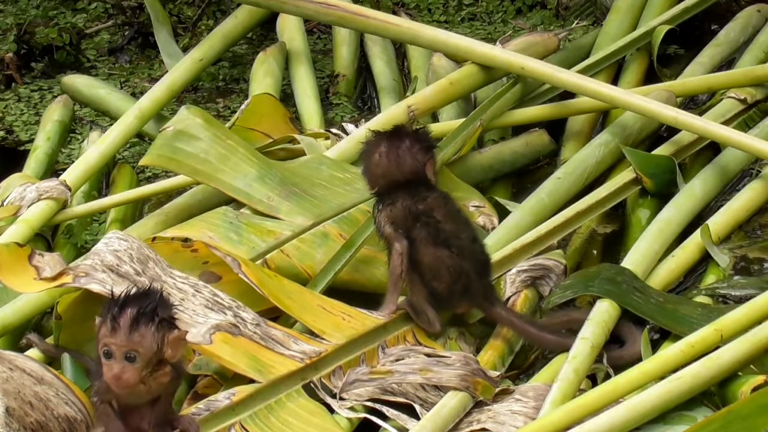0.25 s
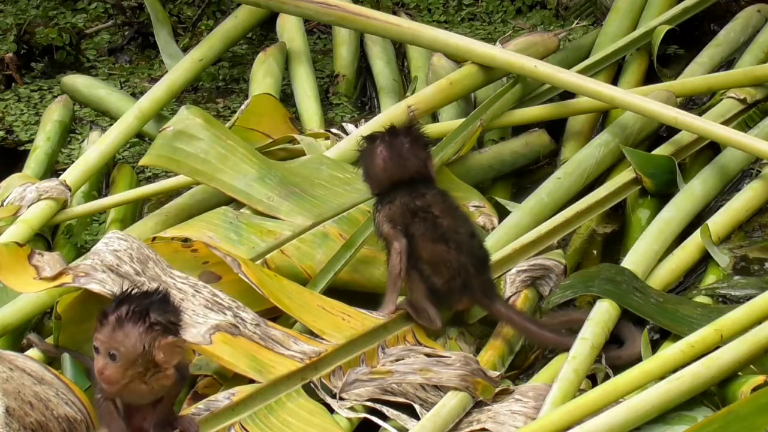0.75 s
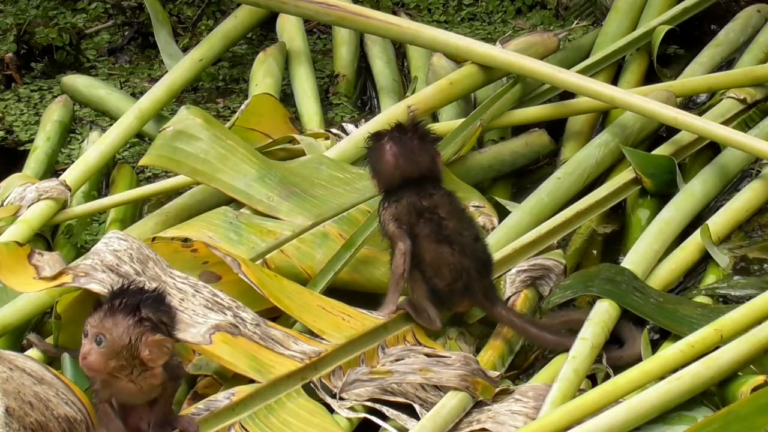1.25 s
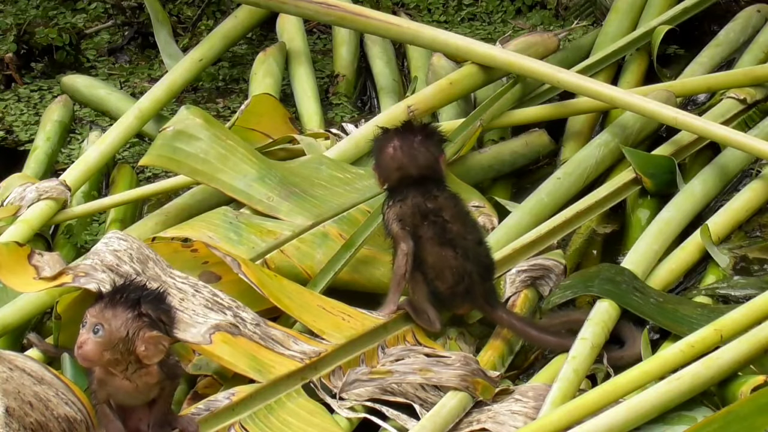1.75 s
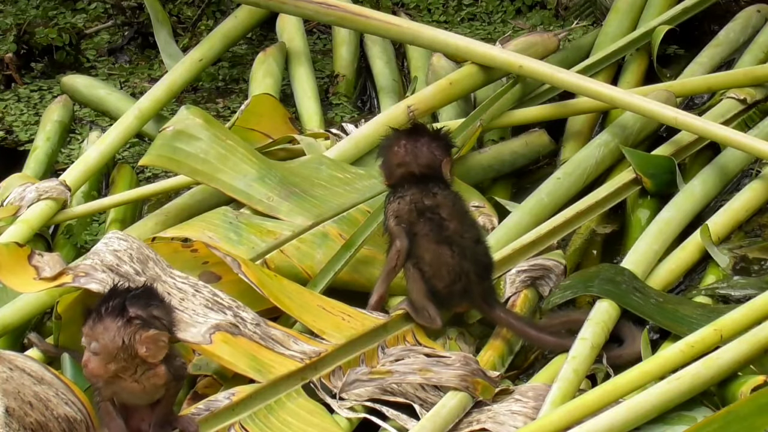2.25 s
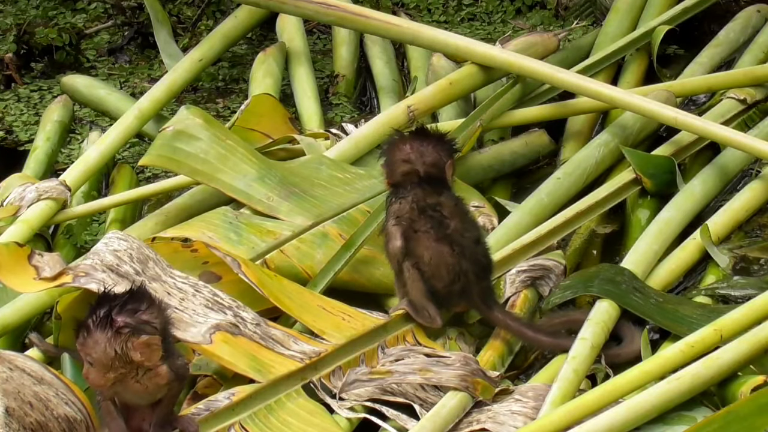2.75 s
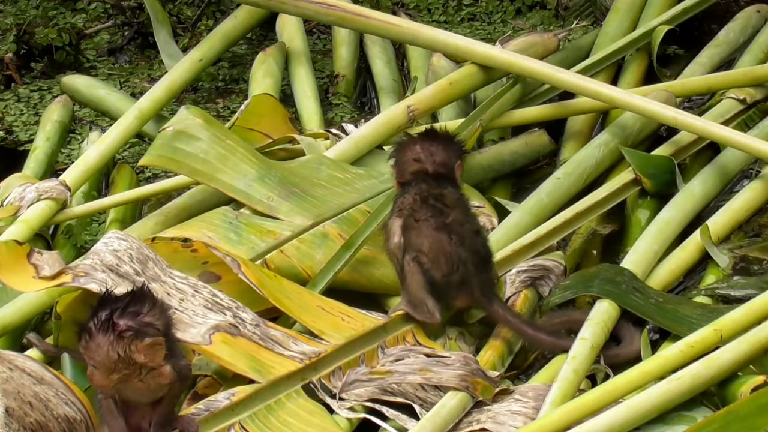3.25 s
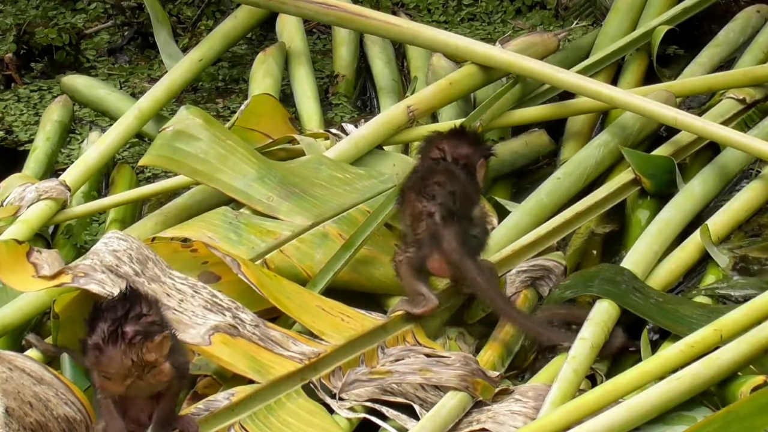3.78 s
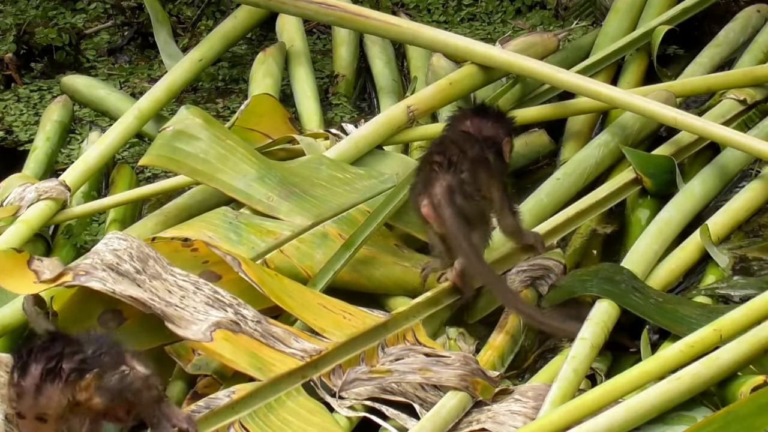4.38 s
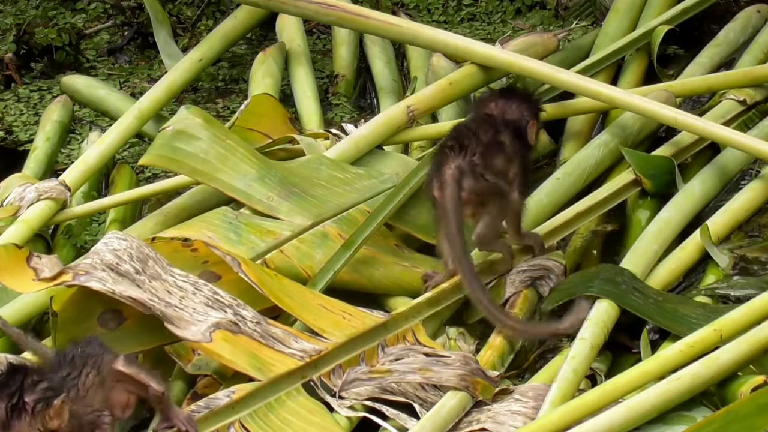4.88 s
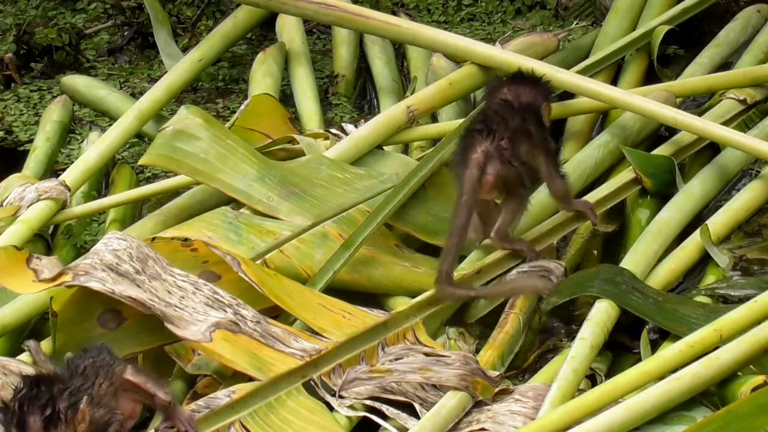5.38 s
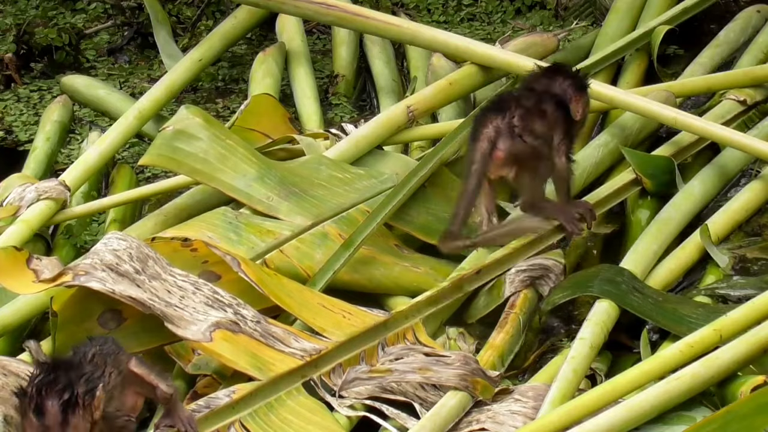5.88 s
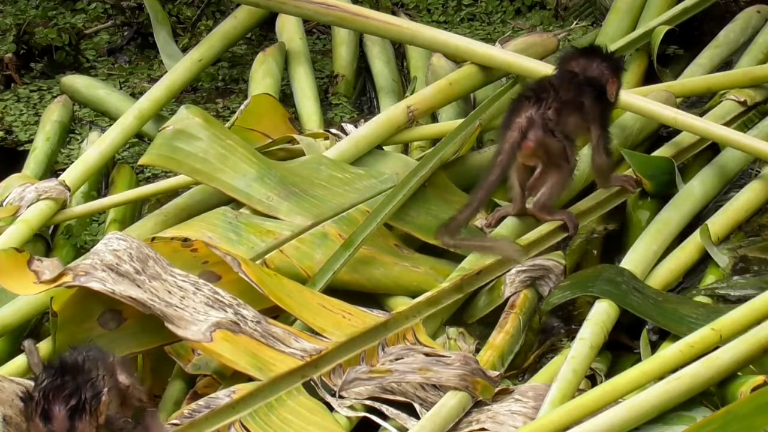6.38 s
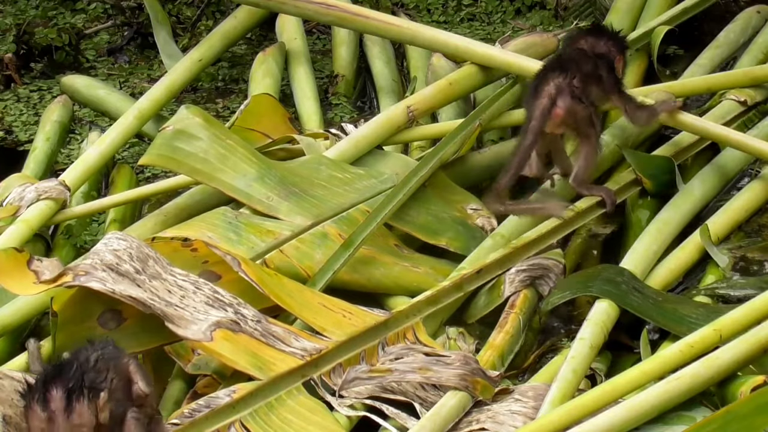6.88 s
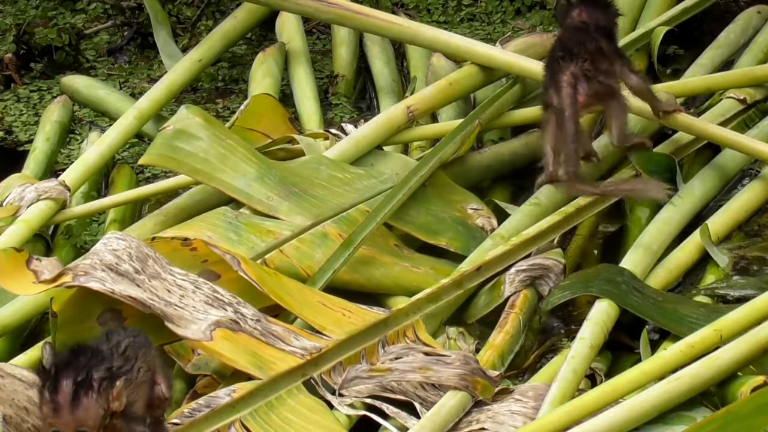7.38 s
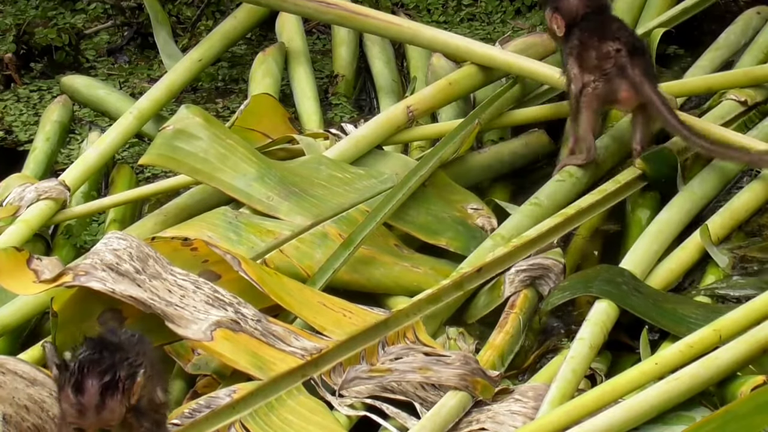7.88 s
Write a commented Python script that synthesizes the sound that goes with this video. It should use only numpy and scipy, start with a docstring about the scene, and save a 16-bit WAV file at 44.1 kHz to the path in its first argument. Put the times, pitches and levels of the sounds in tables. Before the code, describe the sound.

A baby monkey by a pond gives one clear whistled cry, then scattered shrill squeaks and soft coos, over low outdoor rumble and faint insects.

```python
"""Beside a pond, a baby monkey clambers over cut water-plant stems.
Its voice is a stack of overtones shaped by the mouth: shrill screams and quick yelps that turn raspy as
their pitch falls, one long whistled cry, soft closed-mouth coos.
Stems tick and leaves rustle as short noise bursts; hollow pops ring as damped tones.
Insects and far chirps are narrow noise bands, over coloured noise for the low outdoor rumble."""
import sys
import numpy as np
from scipy import signal
from scipy.fft import rfft, irfft, next_fast_len
from scipy.io import wavfile

SR = 44100
rng = np.random.default_rng(int(sys.argv[2]) if len(sys.argv) > 2 else 0)


def generate_wav(signal):
    """Clip the signal to [-1, 1] and save it as 16-bit WAV at the path in sys.argv[1]."""
    frames = np.transpose(np.atleast_2d(signal))
    scaled = np.clip(frames, -1, 1) * 32767
    pcm = np.round(scaled).astype(np.int16)
    wavfile.write(sys.argv[1], SR, pcm)


N = 358533
TIME = np.arange(N) / SR
CUTOFF_HZ = 15600


def from_db(db):
    """Decibels to gain."""
    return 10 ** (np.asarray(db) / 20)


def rms_one(x):
    """Scale to unit power."""
    return x / np.sqrt(np.mean(x ** 2) + 1e-20)


def in_time(rows, t):
    """Each column of a curve table at the times t."""
    knot_s, *columns = np.transpose(rows)
    return [np.interp(t, knot_s, column) for column in columns]


def at_hz(points, hz):
    """Read a spectrum on a log-frequency axis."""
    knot_hz, value = np.transpose(points)
    return np.interp(np.log(np.maximum(hz, 1)), np.log(knot_hz), value)


def coloured(x, spectrum):
    """Give a noise the shape of a spectrum; unit power."""
    size = next_fast_len(x.shape[-1])
    hz = np.fft.rfftfreq(size, 1 / SR)
    shaped = irfft(rfft(x, size) * from_db(at_hz(spectrum, hz)), size)
    return rms_one(shaped[..., :x.shape[-1]])


def wander(rate_hz, size):
    """Smooth random signal of unit power that changes at about the given rate."""
    r = np.exp(-2 * np.pi * rate_hz / SR)
    # the first half lets the filter settle
    smooth = signal.lfilter([1], [1, -2 * r, r * r], rng.standard_normal(2 * size))
    return rms_one(smooth[size:])


def during(start_s, end_s):
    """The sample times between two moments."""
    return TIME[(TIME > start_s) & (TIME < end_s)]


def call(t, pitch_hz, level_db, bright_db_per_octave, rasp, throat, rasp_colour, jitter, jitter_hz,
         shimmer_db, hiss_db, flutter_db, falloff_db, split=0, edge_s=0.0028):
    """Vocal folds sound a stack of overtones through the throat; rasp shakes their pitch and strength."""
    span = (TIME >= t[0]) & (TIME <= t[-1])
    doubling = np.maximum(rasp - .15, 0)
    rasp = np.hypot(rasp, .04)   # never perfectly steady
    shaken_hz = pitch_hz * (1 + jitter * rasp * wander(jitter_hz, len(t)))
    phase = 2 * np.pi * np.cumsum(shaken_hz) / SR
    k = np.arange(1, 17)[:, None]   # overtone number
    overtone_hz = k * pitch_hz
    # brightness lifts the lowest overtones in turn, and all higher ones alike
    press_db = bright_db_per_octave * np.log2(np.minimum(k, 3.4))
    gains = from_db(at_hz(throat, overtone_hz) + press_db) * (overtone_hz < CUTOFF_HZ)
    gains *= from_db(falloff_db * np.log2(np.maximum(k / 4, 1)))   # dB per octave past the fourth
    gains /= np.sqrt(np.sum(gains ** 2, axis=0) / 2)
    # each overtone swells and fades on its own
    gains = gains * from_db(flutter_db * np.array([wander(43, len(t)) for _ in k]))
    tone = np.sum(gains * np.sin(k * phase), axis=0)
    tone *= from_db(shimmer_db * rasp * wander(jitter_hz, len(t)))
    # in a hard rasp strong and weak cycles alternate, which puts tones between the overtones
    tone *= 1 + split * doubling * np.cos(phase / 2)
    # turbulent air escapes in a puff on every cycle
    hiss = coloured(rng.standard_normal(len(t)) * (1 + np.cos(phase)), rasp_colour)
    share = from_db(hiss_db) * rasp
    edges = np.clip(np.minimum(t - t[0], t[-1] - t) / edge_s, 0, 1)
    voice = (tone + share * hiss) / np.sqrt(1 + share ** 2)
    out = np.zeros(N)
    out[span] = voice * from_db(level_db) * edges
    return out


# throat with the mouth wide: (freq_hz, gain_db)
WIDE_THROAT = [(800, 23.5), (1400, 2.5), (2000, -10), (2750, 6.5), (3300, -3.5), (4200, 7), (5000, -11),
               (6200, 2), (7200, -0.5), (8300, 0.5), (9400, -6), (10800, -8), (12500, -12), (14500, -25)]
# turbulent air in the rasp: (freq_hz, gain_db)
RASP_SPECTRUM = [(1200, -44), (2800, -5), (4000, 8), (5000, 8), (6400, 24.5), (8300, 23), (9800, 9),
                 (15000, -1)]
# most piercing just under the top, then thinning to a whistle: (pitch_hz, bright_db_per_octave)
VOICE_REGISTER = [(1400, 1), (2000, -0.5), (2350, -0.5), (2700, 9.5), (3080, 5), (3400, -24)]
# the voice breaks up at this sag from the highest pitch so far, and clears again lower down
BREAK_OCTAVES, BREAK_WIDTH_OCTAVES = 0.786, 0.383
ONSET_RASP, ONSET_S = 0.41, 0.0064   # the folds also catch as a squeak starts


def squeak(t, pitch_hz, level_db, bright_db_per_octave, break_rasp, lips_db, steady_rasp, falloff_db):
    """A shrill wide-mouthed call: pitch sets its brightness, and it turns raspy as the pitch sags."""
    sag_octaves = np.log2(np.maximum.accumulate(pitch_hz) / pitch_hz)
    breaking = np.exp(-((sag_octaves - BREAK_OCTAVES) / BREAK_WIDTH_OCTAVES) ** 2)
    onset = ONSET_RASP * np.exp(-(t - t[0]) / ONSET_S)
    rasp = np.clip(steady_rasp + onset + break_rasp * breaking, 0, 1)
    lips = [(7000, 0), (9500, lips_db)]
    throat = [(hz, db + at_hz(lips, hz)) for hz, db in WIDE_THROAT]
    rasp_colour = [(hz, db + at_hz(lips, hz)) for hz, db in RASP_SPECTRUM]
    bright = bright_db_per_octave + at_hz(VOICE_REGISTER, pitch_hz)
    return call(t, pitch_hz, level_db, bright, rasp, throat, rasp_colour, jitter=.05, jitter_hz=700,
                shimmer_db=5, hiss_db=2.5, flutter_db=3.2, falloff_db=falloff_db, split=0.28,
                edge_s=0.0025)


# pitch and loudness of the long screams, one curve each: (time_s, pitch_hz, level_db)
SCREAM_CURVES = [
    [(2.122, 2740, -56), (2.146, 3310, -38), (2.168, 2393, -33), (2.19, 2707, -36.5), (2.205, 3390, -28.5),
     (2.22, 2858, -30), (2.24, 2560, -25.5), (2.26, 2434, -34), (2.278, 1925, -27), (2.309, 1045, -46.5)],
    [(4.425, 2028, -46), (4.45, 1778, -39), (4.469, 2740, -34), (4.492, 2140, -28), (4.518, 1198, -41.5),
     (4.538, 830, -43)],
    [(5.791, 2030, -47), (5.825, 3090, -30), (5.838, 2718, -30), (5.86, 2782, -22.5), (5.877, 2667, -33),
     (5.893, 2203, -26), (5.932, 1440, -36.5), (5.958, 1258, -41), (5.974, 1100, -50)],
    [(7.084, 1245, -44.5), (7.102, 2600, -36.5), (7.128, 2817, -27), (7.14, 3060, -25),
     (7.162, 3152, -24.5), (7.175, 2263, -39), (7.2, 1474, -36.5), (7.232, 1394, -39.5), (7.259, 1030, -54)],
]
# voice of each scream, brightness before register:
# (bright_db_per_octave, break_rasp [0-1], lips_treble_db, steady_rasp [0-1])
SCREAM_TIMBRES = [(2, 0.07, 0, 0.01), (-1, 0.47, 3, 0.06), (-0.5, 0.93, -2, 0), (-0.5, .9, -9.5, 0.02)]


def screams():
    """Long squeaks whose tightening folds climb, waver at the top and collapse."""
    out = np.zeros(N)
    for curve, timbre in zip(SCREAM_CURVES, SCREAM_TIMBRES):
        t = during(curve[0][0], curve[-1][0])
        pitch_hz, level_db = in_time(curve, t)
        out += squeak(t, pitch_hz, level_db, *timbre, falloff_db=-5.5)
    return out


# short yelps, one pitch arch each, level at the arch top before the attack:
# (start_s, length_s, rise_s, arch_half_width_s, top_hz, level_db,
#  bright_db_per_octave [before register], break_rasp [0-1], lips_treble_db)
YELP_ARCHES = [(0.107, 0.0099, 0.0078, 0.015, 1150, -51, 2, .3, -14),
               (0.328, .02, .01, 0.011, 1400, -49, -3, .3, -5),
               (2.118, 0.018, .003, 0.054, 3960, -45.5, -10, 0, -10),
               (3.329, 0.027, .015, 0.025, 3656, -31.5, 1, .3, 4),
               (3.354, 0.032, 0.0029, .016, 2070, -32, 2, 0.23, -1),
               (3.4, .055, .01, .016, 2880, -30.5, 0, 0, -4),
               (3.725, 0.062, 0.034, 0.026, 2110, -42.5, -14, .3, 11.5),
               (4.386, .035, 0.021, 0.031, 2775, -51, -8, .2, 8),
               (5.575, .052, .012, .06, 1517, -44.5, -7.5, 1, 15.5),
               (6.892, .055, .004, 0.083, 1430, -42.5, -9, 0.4, 3.5),
               (8.11, .04, 0.02, 0.012, 2780, -39, -7.5, .5, 14.5)]
SLACK_HZ, YELP_DB_PER_OCTAVE = 703, 7   # pitch of the slack folds; louder the higher it goes
YELP_ATTACK_S, YELP_ATTACK_DB = 0.01, 4.5   # swells in from this far below


def yelps():
    """One quick push tightens the folds and lets go; pitch and level rise and fall together."""
    out = np.zeros(N)
    for start_s, length_s, rise_s, half_width_s, top_hz, top_db, *timbre in YELP_ARCHES:
        t = during(start_s, start_s + length_s)
        arch = 1 / (1 + ((t - start_s - rise_s) / half_width_s) ** 2)
        pitch_hz = SLACK_HZ + (top_hz - SLACK_HZ) * arch
        attack_db = -YELP_ATTACK_DB * np.exp(-(t - start_s) / YELP_ATTACK_S)
        level_db = top_db + YELP_DB_PER_OCTAVE * np.log2(pitch_hz / top_hz) + attack_db
        out += squeak(t, pitch_hz, level_db, *timbre, steady_rasp=0.23, falloff_db=-0.5)
    return out


# the long cry: (time_s, pitch_hz, level_db)
CRY_CURVE = [(0.476, 1174, -60), (0.486, 1209, -50.5), (0.578, 1247, -49), (0.72, 1500, -38),
             (0.872, 1547, -33), (0.918, 1536, -34), (0.958, 1511, -40.5), (0.998, 1344, -52.5)]
# throat with the lips rounded: (freq_hz, gain_db)
ROUND_THROAT = [(1200, -1), (1550, -2), (2450, -1.5), (2980, -6), (3100, 6), (3600, -16), (3950, -0.5),
                (4650, -4.5), (4900, -16), (6200, -27), (7700, -17.5), (9200, -34), (10800, -22),
                (12000, -29), (15000, -38)]
CRY_BRIGHT_DB_PER_OCTAVE, CRY_BRIGHT_PER_DB = 2, 0.29   # at full strength; loss per dB below it
CRY_CRACK_S, CRY_CRACK_WIDTH_S, CRY_CRACK_RASP = .55, .035, 0.39   # cracks briefly before it climbs


def cry():
    """One clear whistled cry through rounded lips, brighter as it swells."""
    t = during(CRY_CURVE[0][0], CRY_CURVE[-1][0])
    pitch_hz, level_db = in_time(CRY_CURVE, t)
    bright = CRY_BRIGHT_DB_PER_OCTAVE + CRY_BRIGHT_PER_DB * (level_db - level_db.max())
    rasp = CRY_CRACK_RASP * np.exp(-((t - CRY_CRACK_S) / CRY_CRACK_WIDTH_S) ** 2)
    return call(t, pitch_hz, level_db, bright, rasp, ROUND_THROAT, RASP_SPECTRUM, jitter=0.03,
                jitter_hz=200, shimmer_db=1, hiss_db=-21, flutter_db=0.16, falloff_db=-2, split=4.4,
                edge_s=0.0033)


# soft coos, settled pitch and level before the fade: (start_s, length_s, pitch_hz, level_db)
COO_NOTES = [(3.697, 0.033, 745, -45), (4.131, 0.056, 599, -47.5), (4.393, 0.057, 610, -47.5),
             (6.611, 0.077, 576, -47), (6.788, .11, 573, -46), (7.012, 0.05, 620, -45.5)]
# throat with the mouth closed: (freq_hz, gain_db)
CLOSED_THROAT = [(600, -0.5), (1200, -2.5), (1900, -52), (4200, -21), (8000, -21), (14000, -16)]
COO_SCOOP, COO_SETTLE_S = .17, .018   # starts this share sharp and settles
COO_EDGE_S, COO_FADE_DB = 0.005, 6.5   # ramp at each end; fade by the end


def coos(bright_db_per_octave=-1, rasp=.2):
    """Soft coos with the mouth shut slide down on to their note and fade."""
    out = np.zeros(N)
    for start_s, length_s, note_hz, note_db in COO_NOTES:
        t = during(start_s, start_s + length_s)
        age_s = t - start_s
        pitch_hz = note_hz * (1 + COO_SCOOP * np.exp(-age_s / COO_SETTLE_S))
        level_db = note_db - COO_FADE_DB * (age_s / length_s) ** 2
        out += call(t, pitch_hz, level_db, bright_db_per_octave, rasp, CLOSED_THROAT, RASP_SPECTRUM,
                    jitter=0.052, jitter_hz=150, shimmer_db=9, hiss_db=-18, flutter_db=1.5,
                    falloff_db=-4, edge_s=COO_EDGE_S)
    return out


# stems snapping and ticking, relative level and dullness: (start_s, level_db, dullness_db)
STEM_TICKS = [(4.2149, -29, -18), (4.2571, -33.5, -8), (4.902, -32, -14), (5.004, -35, -11),
              (5.0821, -30, -3), (5.1379, -24, -14.5), (5.182, -35, -15), (5.687, -32, -21),
              (6.42, -37.5, -2)]
# breaking fibres: (freq_hz, gain_db)
FIBRE_SPECTRUM = [(500, 10.5), (1500, -2.5), (3000, -3.5), (5000, -4.5), (8000, 4.5), (11000, -6),
                  (15000, -19)]


def stems(crack_s=0.0031, knock_s=0.0055, split_hz=5000, crack_db=-3, knock_db=-4):
    """Each tick is a burst of breaking fibres: a brief bright crack and a duller knock that lasts longer."""
    out, fibres = np.zeros(N), coloured(rng.standard_normal(N), FIBRE_SPECTRUM)
    low = signal.sosfilt(signal.butter(5, split_hz, fs=SR, output="sos"), fibres)
    high = signal.sosfilt(signal.butter(5, split_hz, "high", fs=SR, output="sos"), fibres)
    for start_s, level_db, dullness_db in STEM_TICKS:
        span = (TIME >= start_s) & (TIME < start_s + .05)
        age_s = TIME[span] - start_s
        dull = from_db(dullness_db + 8.5)
        crack = from_db(crack_db) * np.exp(-age_s / crack_s) * high[span]
        knock = from_db(knock_db) * np.exp(-age_s / knock_s) * low[span]
        out[span] += from_db(level_db) * (crack + dull * knock) / np.sqrt(1 + dull ** 2)
    return out


# leaves brushed: (centre_s, half_length_s, level_db)
LEAF_BRUSHES = [(0.564, 0.0085, -53), (0.955, .007, -53), (2.714, 0.018, -53.5), (2.862, 0.013, -50.5),
                (3.168, 0.022, -53), (4.199, 0.026, -54), (4.277, 0.018, -52.5), (5.017, 0.036, -52),
                (5.103, 0.031, -51), (7.754, 0.04, -50), (7.965, 0.023, -54.5)]
# leaf hiss: (freq_hz, gain_db)
LEAF_SPECTRUM = [(1000, 0), (4000, -3.5), (6000, -4), (8200, 10.5), (11000, -1), (15000, -13)]


def leaves(grain_db=4.5):
    """Dry leaves give short swells of grainy hiss."""
    swell = sum(from_db(level_db) * np.exp(-((TIME - centre_s) / half_s) ** 2)
                for centre_s, half_s, level_db in LEAF_BRUSHES)
    grains = rng.standard_normal(N) * from_db(grain_db * wander(260, N))
    return swell * coloured(grains, LEAF_SPECTRUM)


# soft low pops, amplitude at the start of the decay: (start_s, level_db)
HOLLOW_POPS = [(.345, -41), (.42, -39.5), (.505, -38.5), (.565, -39), (.635, -41)]


def pops(ring_hz=540, decay_s=0.0076):
    """Small hollow pops: a damped tone rings for a few cycles."""
    out = np.zeros(N)
    for start_s, level_db in HOLLOW_POPS:
        span = (TIME >= start_s) & (TIME < start_s + .06)
        age_s = TIME[span] - start_s
        ring = np.exp(-age_s / decay_s) * np.sin(2 * np.pi * ring_hz * age_s)
        out[span] += from_db(level_db) * ring
    return out


def shrill(centre_hz, width_hz):
    """A narrow band of buzzing: two slow random signals on a carrier's cosine and sine."""
    phase = 2 * np.pi * np.cumsum(centre_hz * np.ones(N)) / SR
    return wander(width_hz / 2, N) * np.cos(phase) + wander(width_hz / 2, N) * np.sin(phase)


# gliding phrases of one insect, level relative: (start_s, length_s, first_hz, last_hz, level_db)
INSECT_PHRASES = [(0, 0.48, 5830, 6300, -58.5), (.55, 0.9, 5810, 6400, -64), (1.56, 1, 5750, 6350, -62),
                  (2.62, 0.48, 5800, 5770, -60), (3.18, .25, 5680, 5530, -59),
                  (3.46, 0.96, 6010, 5870, -54.5), (4.38, 1.95, 6020, 5880, -59.5),
                  (6.4, 0.58, 5740, 6010, -58.5), (7.05, 1.08, 5970, 5800, -66)]
# far insect chorus: (centre_hz, width_hz, level_db)
INSECT_CHORUS = [(2047, 420, -71), (4150, 870, -72.5), (5850, 680, -73), (7280, 150, -68.5),
                 (9100, 1500, -75)]
PHRASE_SWELL_S, PHRASE_WAVER_DB, SINGER_TRIM_DB = 0.074, 3, -6.5


def insects():
    """Narrow buzzing bands: one gliding singer in front of a chorus of slightly wavering level."""
    hz, gain = np.full(N, float(INSECT_PHRASES[0][2])), np.zeros(N)
    for start_s, length_s, first_hz, last_hz, level_db in INSECT_PHRASES:
        end_s = start_s + length_s
        glide_hz = np.interp(TIME, [start_s, end_s], [first_hz, last_hz])
        hz = np.where(TIME >= start_s, glide_hz, hz)
        swell = np.clip(np.minimum(TIME - start_s, end_s - TIME) / PHRASE_SWELL_S, 0, 1)
        gain += from_db(level_db) * swell
    waver = from_db(PHRASE_WAVER_DB * wander(4, N) + SINGER_TRIM_DB)
    singer = gain * waver * shrill(hz, width_hz=260)
    chorus = sum(from_db(level_db + wander(9, N)) * shrill(centre_hz, width_hz)
                 for centre_hz, width_hz, level_db in INSECT_CHORUS)
    return singer + chorus


# faint far chirps: (centre_s, half_length_s, pitch_hz, level_db)
FAR_CHIRPS = [(6.221, 0.08, 2890, -61.5), (7.67, 0.066, 2085, -62), (7.949, 0.015, 3740, -54)]


def distant_calls():
    """Faint blurred chirps from across the pond: swells of narrow-band noise."""
    return sum(from_db(level_db) * np.exp(-((TIME - centre_s) / half_s) ** 2)
               * shrill(pitch_hz, width_hz=300)
               for centre_s, half_s, pitch_hz, level_db in FAR_CHIRPS)


# outdoor rumble and hiss, relative: (freq_hz, density_db_per_hz)
AIR_SPECTRUM = [(15, -50), (25, -19), (59, -2), (170, -0.5), (372, -18), (700, -27), (1500, -40),
                (2400, -42), (4300, -49.5), (5200, -52), (8000, -41), (15900, -53)]
# loudness of the air: (time_s, level_db)
AIR_LEVEL_CURVE = [(0.0, -37), (2.29, -38), (6.86, -37), (7.25, -41), (8.13, -35.5)]
# left-right likeness: (freq_hz, likeness [0-1])
AIR_LIKENESS = [(130, 0.93), (290, 0.79), (640, 0.37), (4000, 1), (6800, 1), (15000, 0.04)]
# left-over-right balance: (freq_hz, balance_db)
AIR_BALANCE = [(60, -5), (380, -1.5), (1300, 1), (15000, -1.5)]


def air():
    """Distant rumble, nearly alike in both ears at its lowest, under a faint hiss that is wide at the top."""
    size = next_fast_len(N)
    hz = np.fft.rfftfreq(size, 1 / SR)
    mid, side = rfft(rng.standard_normal((2, size)))
    alike = np.clip(at_hz(AIR_LIKENESS, hz), 0, .99)
    ears = np.array([[1], [-1]])   # left, right
    pair = np.sqrt(1 + alike) * mid + ears * np.sqrt(1 - alike) * side
    pair = pair * from_db(ears * at_hz(AIR_BALANCE, hz) / 2)
    level_db, = in_time(AIR_LEVEL_CURVE, TIME)
    return from_db(level_db) * coloured(irfft(pair, size)[:, :N], AIR_SPECTRUM)


def bank(x, near_db, near_t60, far_db, far_t60, width):
    """Stems close by scatter the sound at once; the banks return a weak, coloured tail (t60 in s)."""
    t = TIME[:SR // 2]
    noise = rng.standard_normal((2, 2, len(t)))
    near = noise[0] * from_db(-60 * t / near_t60) * (t > .002)
    far_spectrum = [(500, -35), (1800, -8.0), (2800, 2.5), (5000, -6.5), (8000, -5), (15000, -9)]
    far = coloured(noise[1], far_spectrum) * from_db(-60 * t / far_t60) * (t > .012)
    echoes = from_db(near_db) * rms_one(near) + from_db(far_db) * rms_one(far)
    mid, side = echoes / np.sqrt(len(t))
    response = np.array([mid + width * side, mid - width * side])
    return x + signal.fftconvolve(x[None], response, axes=1)[:, :N]


def scene():
    """The monkey and its footing are straight ahead; its sharp calls scatter most among the stems."""
    sharp = bank(screams() + yelps() + stems() + leaves() + pops(), near_db=-5.0, near_t60=0.094,
                 far_db=-13.0, far_t60=0.25, width=0.12)
    soft = bank(cry() + coos(), near_db=-8.0, near_t60=0.1, far_db=-21.5, far_t60=0.36, width=0.23)
    return sharp + soft + insects() + distant_calls() + air()


def record(dry, port_hz=9500, port_db=-4, port_lag_s=.00016):
    """Treble bends round the casing and reaches the two ports differently; the top is cut steeply."""
    high_pass = signal.butter(5, port_hz, "high", fs=SR, output="sos")
    treble = signal.sosfilt(high_pass, dry.mean(axis=0))
    side = from_db(port_db) * np.interp(TIME - port_lag_s, TIME, treble)
    top_cut = signal.ellip(10, .1, 80, CUTOFF_HZ, fs=SR, output="sos")
    return signal.sosfilt(top_cut, dry + np.array([side, -side]))


dry = scene()
out = record(dry)
generate_wav(out)
```